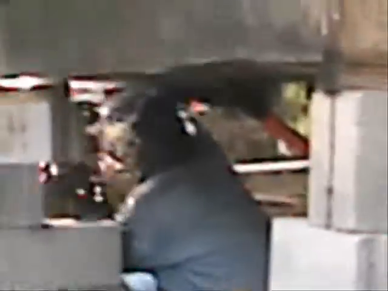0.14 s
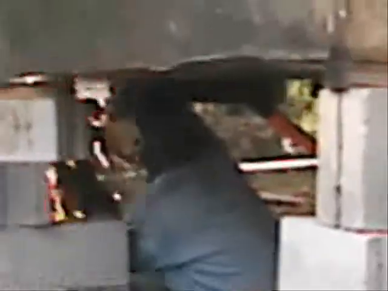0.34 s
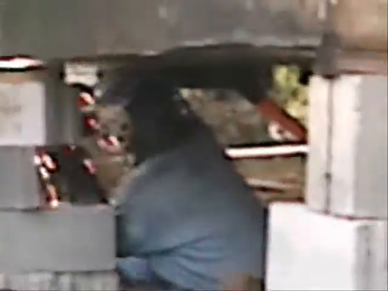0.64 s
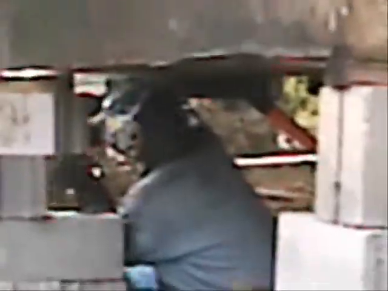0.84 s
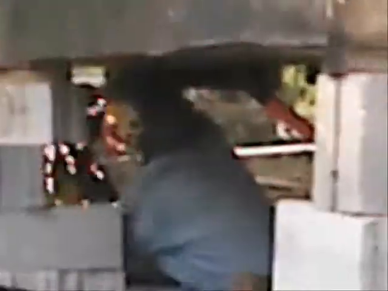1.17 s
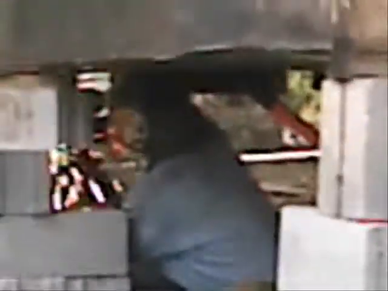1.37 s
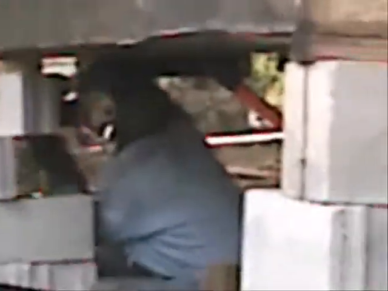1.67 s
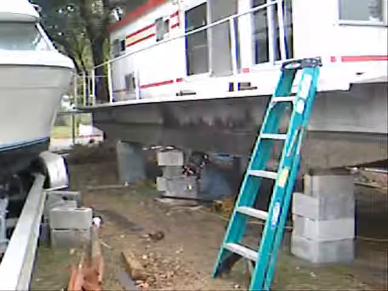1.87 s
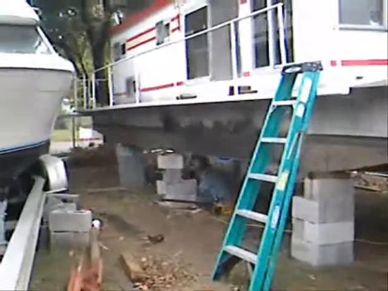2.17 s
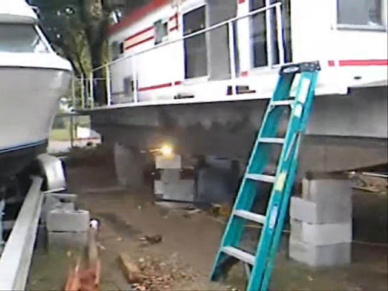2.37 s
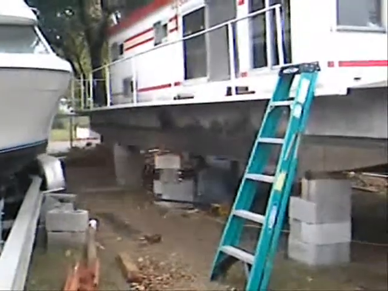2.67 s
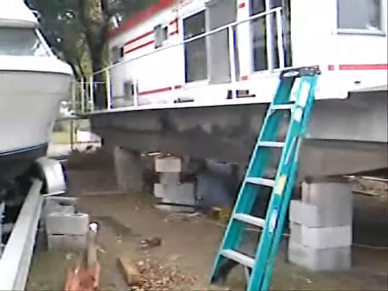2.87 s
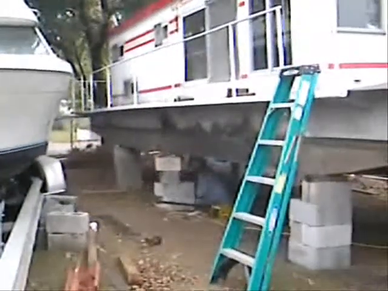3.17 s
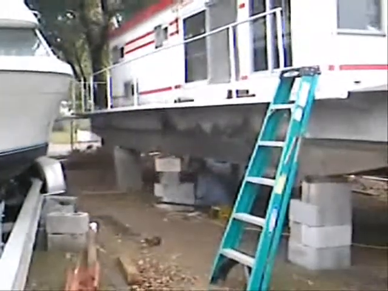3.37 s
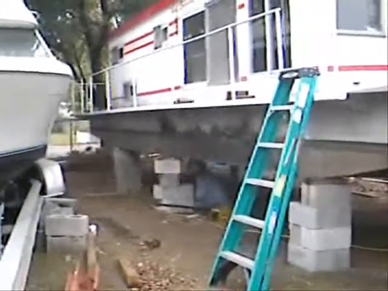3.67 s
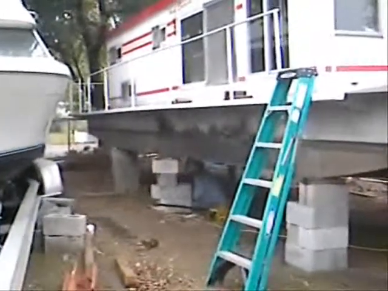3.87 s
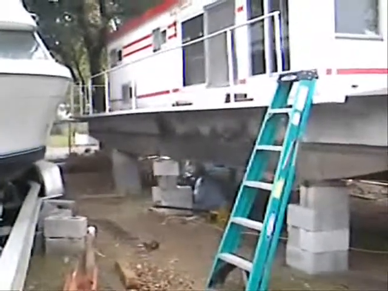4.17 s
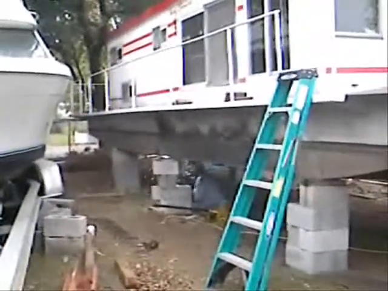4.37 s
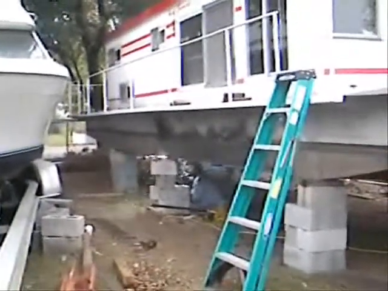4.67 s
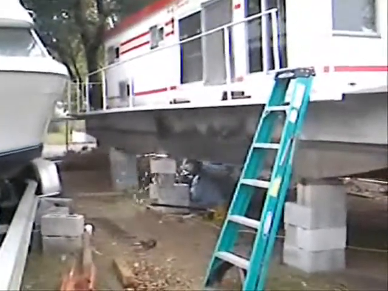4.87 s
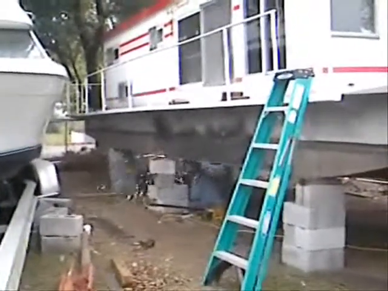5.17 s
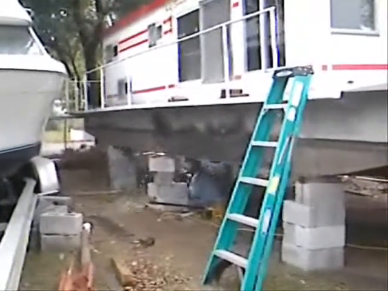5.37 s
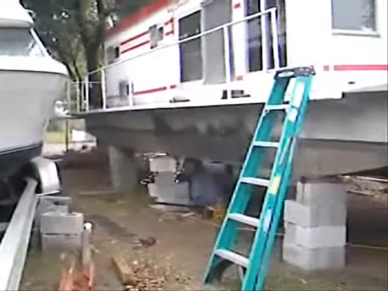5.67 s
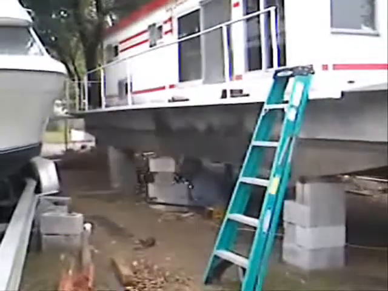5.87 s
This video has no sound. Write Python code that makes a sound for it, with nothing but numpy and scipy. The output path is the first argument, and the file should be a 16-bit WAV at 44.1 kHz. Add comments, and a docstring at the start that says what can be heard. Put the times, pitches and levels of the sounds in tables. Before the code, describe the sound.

A small engine hammers in a rapid, nearly continuous buzz, its speed drifting slightly. Brief molten-metal snaps cut through, the last far louder and distorted. After a tiny dead silence the same engine continues at a distance, with softer clatter, hollow low booms and a slow waver in pitch, and no more snaps. Open-air yard, lo-fi camera microphone with harsh, grainy treble.

```python
"""A single-cylinder engine drives a welder under a boat on blocks; its speed hunts around 30 firings a second.
First it is heard close to the arc: engine orders, clatter and fan whine, with spits of molten metal that ring
the steel, the last an overloading crack. A short silence follows while the camera pauses.
Then the engine is heard from across the yard, where its low booms carry.
Throughout, the camera holds each sample of a slow rate, and the spectral images add a gritty treble."""
import sys
import numpy as np
from scipy import signal
from scipy.fft import rfft, irfft, next_fast_len
from scipy.io import wavfile
from scipy.ndimage import uniform_filter1d, map_coordinates

SR = 44100
rng = np.random.default_rng(int(sys.argv[2]) if len(sys.argv) > 2 else 0)


def to_wav(s):
    """Save 16-bit WAV."""
    ch = np.atleast_2d(s).T  # columns
    pcm = np.round(np.clip(ch, -1, 1) * 32767)  # PCM
    wavfile.write(sys.argv[1], SR, pcm.astype(np.int16))


N = 265482

# engine speed at each spot: (time [s], firing rate [1/s])
SPEED_NEAR = [(0.0, 28.79), (0.15, 28.88), (0.43, 30.1), (0.69, 30.49), (1.11, 29.32), (1.3, 29.27),
              (1.55, 31.11), (2.0, 31.07)]
SPEED_FAR = [(2.13, 29.96), (2.65, 29.51), (2.88, 30.69), (3.13, 31.23), (3.96, 30.18), (4.35, 28.68),
             (4.54, 28.92), (4.73, 30.22), (4.92, 30.45), (5.35, 29.64), (5.71, 29.52), (6.02, 29.96)]
# engine orders at each spot: (multiple of firing rate [-], relative level [dB])
ORDERS_NEAR = [(2, -32), (3, -36.5), (4, -23), (5, -21.5), (6, -26.5), (7, -36), (8, -37.5), (9, -35.5),
               (10, -30.5), (11, -29), (12, -29), (13, -40), (14, -52), (16, -37.5), (17, -52), (18, -33.5),
               (20, -33), (21, -51), (22, -34.5), (23, -37), (24, -48), (25, -36), (27, -36), (29, -28.5),
               (30, -42), (31, -35), (33, -39.5), (34, -34.5)]
ORDERS_FAR = [(2, -38), (3, -41), (4, -29.5), (5, -26.5), (6, -32.5), (7, -38), (8, -34), (9, -47),
              (10, -31.5), (11, -37), (12, -39.5), (13, -39), (14, -36), (15, -44), (16, -40), (17, -46.5),
              (18, -44.5), (23, -42.5), (24, -40.5), (25, -36), (28, -39), (29, -40.5), (31, -48.5),
              (36, -44.5)]
# spectrum of the mechanical clatter at each spot: (frequency [Hz], relative level [dB])
CLATTER_NEAR = [(30, -20), (60, -23.5), (120, -15.5), (200, -11), (320, 0), (480, -10.5), (620, -6.5),
                (830, -2), (1050, -11), (1400, -16.5), (1800, -17.5), (2300, -19.5), (3000, -24.5),
                (3800, -20.5)]
CLATTER_FAR = [(30, -15), (60, -14), (120, -11.5), (200, -7.5), (320, 0.5), (480, -5.5), (620, -5),
               (830, -4), (1050, -2), (1400, -13.5), (1800, -17), (2300, -10.5), (3000, -18.5),
               (3800, -16.5)]
# housing resonances: (multiple of firing rate [-], relative level [dB], resonance [Hz], width [Hz])
HOUSING_LINES = [(8, -24, 249, 3.9), (20, -30, 622, 8.6), (23, -25, 716, 15), (25, -26, 778, 11)]
# load on the engine while the arc draws current: (start [s], end [s])
WELDS = [(-1, 1.4), (4, 7)]
# level laws of exhaust and clatter:
# (welding [dB], speed [dB per firing/s], acceleration [dB per firing/s gained each second])
EXHAUST_LAW = (2.1, 0.33, 0.17)
CLATTER_LAW = (1.08, 0.19, 0.058)
# spits of the arc: (time [s], level [dB], 60 dB decay time [s])
SPITS = [(0.2651, -10, .012), (0.3047, -21, .008), (0.418, -20, .008), (1.1977, -17, .008),
         (1.8019, -16, 0.0074), (1.878, -12, 0.014), (1.8908, 11, 0.018)]
# spectrum of a spit: (frequency [Hz], relative level [dB])
SPIT_SPECTRUM = [(100, -21), (500, -0.5), (1100, 3.5), (2000, -0.5), (3000, -.5), (3900, 3)]
# modes of the steel that a spit rings: (frequency [Hz], level relative to the spit [dB], 60 dB decay time [s])
STEEL_MODES = [(1033, -9.5, 0.029), (1532, -10.5, 0.024), (2746, -13, 0.034)]
# fan whine at each spot: (multiple of firing rate [-], level [dB], resonance [Hz], width [Hz])
FAN_NEAR = [(26, -23.5, 793, 80), (28, -28, 826, 130)]
FAN_FAR = [(20, -28, 603, 57), (26, -28.5, 787, 34), (34, -35, 1026, 38)]
# booms that carry across the yard: (multiple of firing rate [-], level [dB], resonance [Hz], width [Hz])
BOOM_LINES = [(6, -24, 184, 6), (12, -35, 373, 12), (14, -33.5, 432, 26)]
# pause of the camera between the two spots: (start [s], end [s])
PAUSE = (2.002, 2.128)

# the governor answers a change of load late and gradually
GOVERNOR_LAG_S, GOVERNOR_EASE_S = 0.2, 0.23
CAMERA_HZ = 8000  # sample rate of the camera
TOP_HZ = 15520  # upper limit of the held sound


def engine(speeds, orders, spectrum, first_firing_s, orders_db, clatter_db, housing_db,
           smear, dispersion, sixfold_db, firing_db):
    """Periodic excitation: orders, clatter and housing lines share one phase, the integral of the firing rate."""
    times, rates = np.transpose(speeds)
    speed = np.interp(np.arange(N) / SR, times, rates)
    cycle = np.cumsum(speed) / SR
    # whole numbers of the cycle count mark the firings
    cycle -= np.interp(first_firing_s * SR, np.arange(N), cycle)
    exhaust_effort = effort_db(speed, EXHAUST_LAW)
    clatter_effort = effort_db(speed, CLATTER_LAW)
    tones = engine_orders(orders, cycle, exhaust_effort, clatter_effort, smear, dispersion)
    rattle = clatter(spectrum, cycle, sixfold_db, firing_db, scatter_db=0.3)
    housing = resonant_lines(HOUSING_LINES, speed, cycle)
    mix = amp(orders_db) * tones
    mix += amp(clatter_db + clatter_effort) * rattle
    mix += amp(housing_db) * housing
    return mix, speed, cycle


def engine_orders(orders, cycle, exhaust_db, clatter_db, smear, dispersion):
    """Fourier synthesis: phased low orders sum to one exhaust thud per firing; high ones whine as running gear."""
    numbers, levels = np.transpose(orders)
    pulse_phases = minimum_phase(numbers, levels)
    out = np.zeros(N)
    for k, db in zip(np.round(numbers).astype(int), levels):
        is_thud = k < 13
        # the muffler lets the upper orders out later, which draws out the thud
        delay_phase = dispersion * max(k - 6, 0) ** 2
        phase = pulse_phases[k] - delay_phase if is_thud else rng.uniform(0, 2 * np.pi)
        # uneven combustion unsteadies the high orders most
        unsteady = smear * min(k / 10, 1)
        effort = exhaust_db if is_thud else clatter_db
        level = db + effort + 7 * unsteady * wobble(3.98)
        phase_wander = unsteady * wobble(9)
        out += amp(level) * np.cos(2 * np.pi * k * cycle + phase + phase_wander)
    return -np.sqrt(2) * out


def minimum_phase(orders, db, size=256):
    """Minimum-phase principle: the log spectrum fixes the phases of a pulse that starts sharply and rings out."""
    log_gain = np.interp(np.arange(size // 2 + 1), orders, np.log(amp(db)))
    log_gain[:2] = log_gain.min()
    cepstrum = irfft(log_gain)
    causal = 2 * cepstrum * (np.arange(size) < size // 2)
    return rfft(causal).imag


def clatter(spectrum, cycle, sixfold_db, firing_db, scatter_db):
    """Amplitude modulation: noise swells once per firing and, slightly and unevenly, six times per firing."""
    sixth = np.floor(6 * cycle).astype(int)
    unevenness = rng.standard_normal(2048)[sixth]
    sixfold_swell = np.cos(2 * np.pi * (6 * cycle - 1 / 3))
    firing_swell = np.cos(2 * np.pi * (cycle - 0.12))
    swell_db = sixfold_db * sixfold_swell + firing_db * firing_swell + scatter_db * unevenness
    return unit(noise(spectrum) * amp(swell_db))


def effort_db(speed, law):
    """Load dependence: the engine is louder when it feeds the arc, runs fast or gathers speed."""
    weld_db, speed_db, pickup_db = law
    t = np.arange(N) / SR - GOVERNOR_LAG_S
    welding = sum(1.0 * ((t > start) & (t < end)) for start, end in WELDS)
    acceleration = np.gradient(speed) * SR
    effort = weld_db * (welding - 0.5)
    effort += speed_db * (speed - speed.mean())
    effort += pickup_db * acceleration
    return uniform_filter1d(effort, max(int(GOVERNOR_EASE_S * SR), 1))


def arc():
    """Impulsive excitation: molten metal bursts out in decaying cracks of noise that briefly ring the steel."""
    out, hiss = np.zeros(N), noise(SPIT_SPECTRUM)
    t = np.arange(SR // 10) / SR
    for start_s, db, t60 in SPITS:
        first = round(start_s * SR)
        span = slice(first, first + len(t))
        crack = hiss[span] * amp(-60 * t / t60)
        ring = np.zeros(len(t))
        for hz, mode_db, mode_t60 in STEEL_MODES:
            ring += amp(mode_db - 60 * t / mode_t60) * np.sin(2 * np.pi * hz * t)
        out[span] += amp(db) * (crack + ring)
    return out


def resonant_lines(lines, speed, cycle):
    """Forced resonance: each unsteady multiple of the firing rate swells as speed carries it through its resonance."""
    out = np.zeros(N)
    for order, db, centre_hz, width_hz in lines:
        k = round(order)
        detuning = 2 * (k * speed - centre_hz) / width_hz
        swell = 1 / (1 + detuning ** 2)
        strength = swell * amp(db + 0.74 * wobble(10))
        out += strength * np.sin(2 * np.pi * k * cycle + 0.19 * wobble(16))
    return np.sqrt(2) * out


def noise(spectrum):
    """Spectral shaping: white noise is filtered to a spectrum within the camera's band, at rms 1."""
    f, db = np.transpose(spectrum)

    def response(hz):
        level = np.interp(np.log(hz + 1), np.log(f), db)
        return amp(level) * (hz < CAMERA_HZ / 2)

    return unit(filtered(rng.standard_normal(N), response))


def wobble(rate):
    """Band-limited fluctuation: a smooth curve through random knots, rate of them a second."""
    knots = rng.standard_normal(int(N * rate / SR) + 4)
    return map_coordinates(knots, [np.arange(N) * rate / SR])


def filtered(x, response):
    """Linear filtering: the spectrum of x is multiplied by a response of frequency."""
    m = next_fast_len(N + 8192)
    return irfft(rfft(x, m) * response(np.fft.rfftfreq(m, 1 / SR)), m)[:N]


def amp(db):
    """Logarithmic level: decibels become an amplitude ratio."""
    return 10 ** (np.asarray(db) / 20)


def unit(x):
    """Power normalisation: x is scaled to rms 1."""
    return x / np.sqrt(np.mean(x ** 2) + 1e-20)


def scene():
    """Superposition: engine, fan and arc add up close by; then engine, fan and booms add up across the yard."""
    near, speed, cycle = engine(
        SPEED_NEAR, ORDERS_NEAR, CLATTER_NEAR, first_firing_s=0.00698,
        orders_db=-1.0, clatter_db=-19.5, housing_db=1.5,
        smear=0.25, dispersion=0.296, sixfold_db=0.3, firing_db=0.63)
    near = near + resonant_lines(FAN_NEAR, speed, cycle)
    far, speed, cycle = engine(
        SPEED_FAR, ORDERS_FAR, CLATTER_FAR, first_firing_s=2.1366,
        orders_db=0.4, clatter_db=-25.5, housing_db=-11,
        smear=0.3, dispersion=0.5, sixfold_db=1.0, firing_db=0.5)
    far = far + resonant_lines(FAN_FAR, speed, cycle)
    far = far + resonant_lines(BOOM_LINES, speed, cycle)
    is_near = np.arange(N) < PAUSE[1] * SR
    return np.where(is_near, near + arc(), far)[None]


def gain_control(x, threshold, depth, release_s):
    """Dynamic compression: an overload pulls the gain down at once, and the gain creeps back."""
    t = np.arange(len(x)) / CAMERA_HZ
    excess = np.log(np.maximum(np.abs(x) / threshold, 1))
    # running peak that decays exponentially
    held = np.maximum.accumulate(excess * np.exp(t / release_s)) * np.exp(-t / release_s)
    return x * np.exp(-depth * held)


def record(dry):
    """Sample and hold: the camera samples slowly, clips, pauses and holds, mirroring sound into the treble."""
    slow = signal.resample_poly(dry[0], CAMERA_HZ, SR)
    slow = gain_control(slow, threshold=0.96, depth=0.17, release_s=1.0)
    slow = np.clip(slow, -1, 1)
    n = np.arange(N)
    running = (n < PAUSE[0] * SR) | (n > PAUSE[1] * SR)
    held = slow[(n * CAMERA_HZ // SR).astype(int)] * running
    return filtered(held, lambda hz: hz < TOP_HZ)[None]


dry = scene()
out = record(dry)
to_wav(out)
```